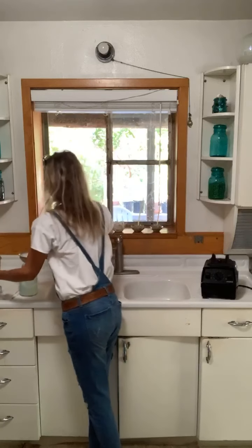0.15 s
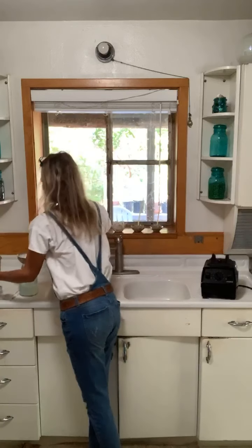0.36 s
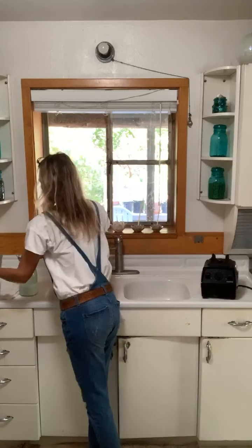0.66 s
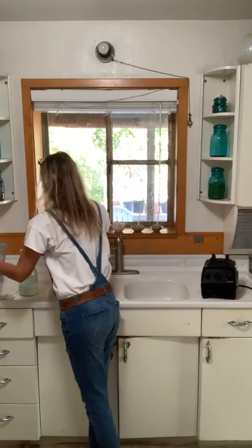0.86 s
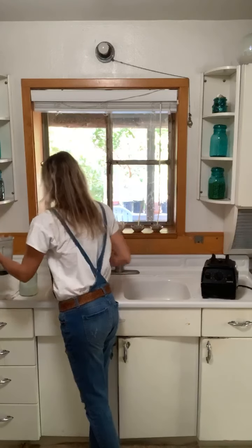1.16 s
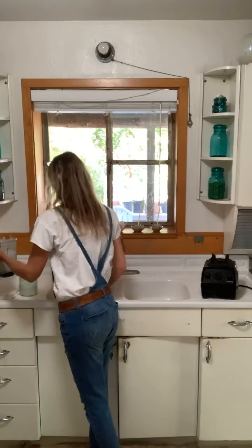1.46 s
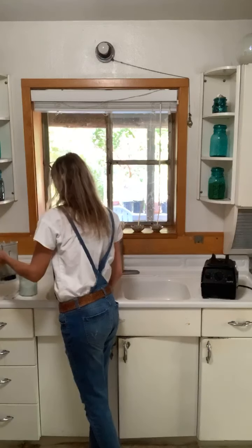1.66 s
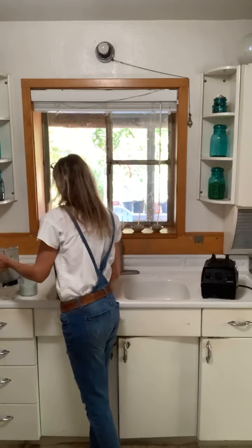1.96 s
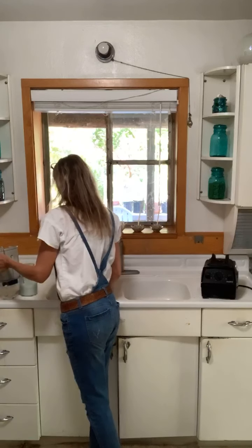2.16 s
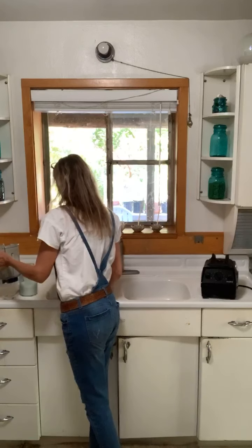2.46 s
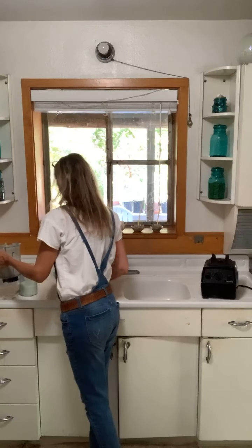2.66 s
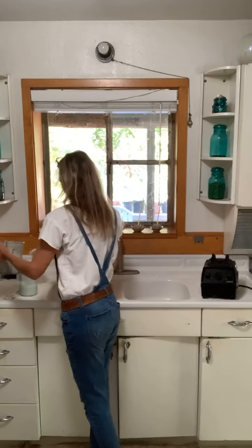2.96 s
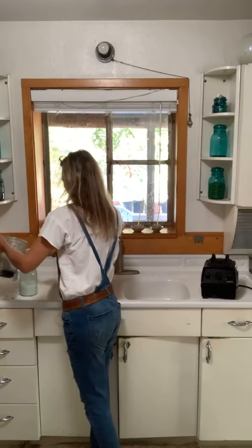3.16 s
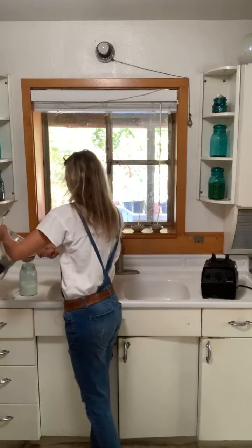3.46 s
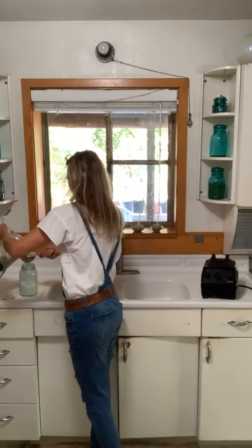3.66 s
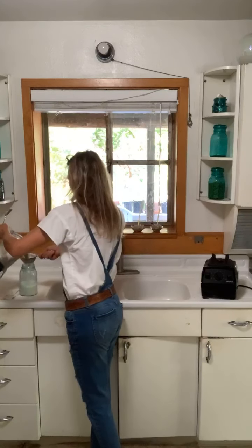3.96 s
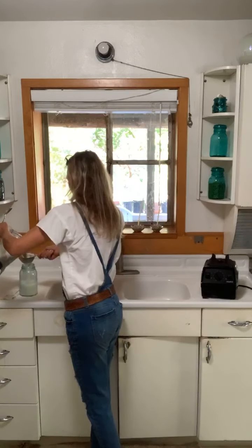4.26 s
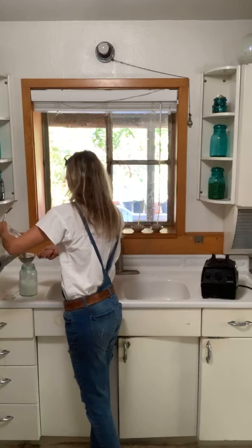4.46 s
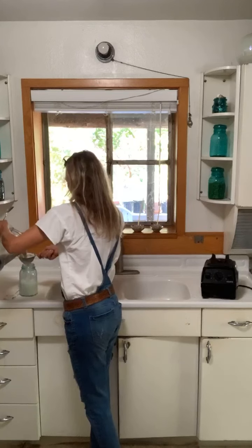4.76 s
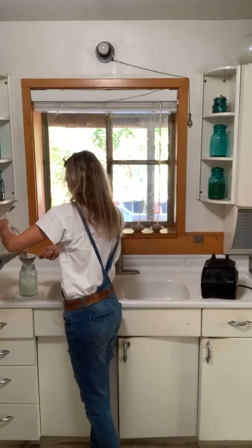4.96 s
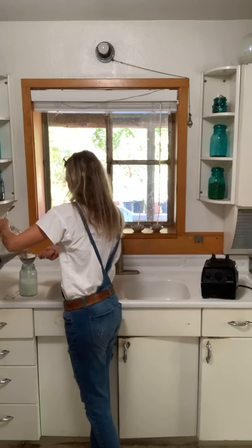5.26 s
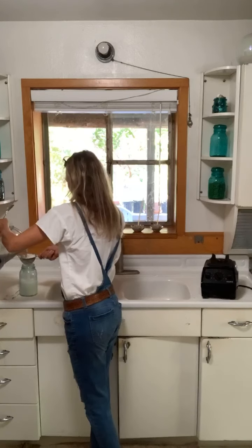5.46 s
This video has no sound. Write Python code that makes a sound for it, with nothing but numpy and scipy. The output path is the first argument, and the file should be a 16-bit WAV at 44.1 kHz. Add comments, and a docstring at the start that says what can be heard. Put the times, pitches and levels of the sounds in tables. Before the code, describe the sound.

A small hard-walled kitchen is heard from across the room, with a short echo, a low wavering motor hum and soft room air throughout. At the start something scuffs the counter; at about 0.1 s a utensil clunks down, metal and counter ringing briefly. Soft settling bumps, a scuff and a light tick follow at 0.35-0.45 s, then faint deep floor booms near 0.5-0.6 s. A faint scuff at 1.0 s and a spoon tick at 1.3 s break the lull. A metal strainer knocks a glass jar at 1.8, 2.05 and 2.27 s: sharp cracks, short metallic and glassy ringing, counter thuds. Two close ticks come at 2.7 s, a faint slide at 3.05 s. From about 3.65 s a spoon rubs softly through wet material, with irregular short scrapes and small hollow plops, clustered near 3.8-3.9, 4.3-4.6 and 4.7-5.2 s, sparse ticks, and a last faint scrape and plop around 5.5 s.

```python
"""In a small hard-walled kitchen, over a motor hum and the soft noise of room air, a utensil is put down.
It rings and settles, and the floor booms faintly under shifting feet; light spoon ticks come throughout.
Then a metal strainer is knocked three times on a glass jar: fading tones ring, and the counter thuds.
Last a spoon scrapes softly (shaped noise) and wet lumps plop into a hollow vessel (short swelling tones).
All is heard from across the room, with an echo made of fading noise."""
import sys
import numpy as np
from scipy import signal
from scipy.fft import rfft, irfft
from scipy.io import wavfile

SR = 44100
rng = np.random.default_rng(int(sys.argv[2]) if len(sys.argv) > 2 else 0)


def dump_mix(stems):
    """Bounce the given channels to the path in sys.argv[1] as a 16-bit WAV at rate SR."""
    frames = np.atleast_2d(stems).T  # one column per channel
    limited = np.clip(frames, -1, 1)  # hard clip at full scale
    pcm = np.round(limited * 32767).astype(np.int16)
    wavfile.write(sys.argv[1], SR, pcm)


N = 247783
TIME = np.arange(N) / SR  # seconds

# Tones of the counter. Each row: frequency in Hz, relative level in dB, time to fade by 60 dB in seconds.
COUNTER_TONES = [(69, -48.5, 0.92), (90, -55.5, 0.4), (109.23, -45.5, 0.21), (185.6, -42.5, 0.44),
                 (210, -38, .35), (275.4, -44.5, 0.65), (407.5, -33.5, 0.2), (480, -34.5, 0.32),
                 (529.7, -44, 0.49), (626, -49, 0.17)]
# Strokes of the spoon along the vessel wall. Each row: start in seconds, length before the release in seconds,
# rubbing level in dB, wall ring level in dB (both before the mix), wall resonance in Hz.
SPOON_STROKES = [(3.825, 0.17, -58.5, -77.5, 2156), (3.862, 0.092, -52, -80, 2240),
                 (4.034, 0.051, -53.5, -73.5, 2200), (4.123, 0.042, -53.5, -77.5, 2200),
                 (4.237, 0.019, -65.5, -75, 2340), (4.349, 0.032, -61, -100, 2330),
                 (4.503, .045, -61, -79, 2350), (4.773, 0.038, -62, -96, 2330),
                 (5.068, 0.033, -58, -92, 2330), (5.501, 0.098, -63.5, -101, 2320)]


def from_db(db):
    """Turn decibels into a gain."""
    return 10 ** (np.asarray(db) / 20)


def at_hz(points, hz):
    """Read a table between its points, along a logarithmic frequency axis."""
    f, value = np.transpose(points)
    return np.interp(np.log(np.maximum(hz, 1)), np.log(f), value)


def convolve(x, response):
    """Play x through an impulse response."""
    return signal.fftconvolve(x, response)[:N]


def clicks(times, levels_db):
    """Place one single-sample impulse for each time."""
    out = np.zeros(N)
    samples = np.round(np.asarray(times) * SR).astype(int)
    np.add.at(out, np.clip(samples, 0, N - 1), from_db(levels_db))
    return out


def colour(x, spectrum, size=4096):
    """Filter x to the given spectrum with no sound ahead of its cause (minimum phase)."""
    gain = from_db(at_hz(spectrum, np.fft.rfftfreq(size, 1 / SR)))
    cepstrum = irfft(np.log(gain))
    # Folding the cepstrum onto its first half gives minimum phase.
    cepstrum[1:size // 2] *= 2
    cepstrum[size // 2 + 1:] = 0
    return convolve(x, irfft(np.exp(rfft(cepstrum))))


def rms_one(x):
    """Scale to an rms level of 1."""
    return x / np.sqrt(np.mean(x ** 2) + 1e-20)


def ring(x, modes, rise_s):
    """Each impulse sets off a body's fading tones, which take a moment to build up."""
    t = TIME[:SR]
    tones = sum(from_db(db - 60 * t / t60) * np.sin(2 * np.pi * hz * t) for hz, db, t60 in modes)
    return convolve(x, tones * (1 - np.exp(-t / rise_s)))


def tilted(modes, db_per_octave):
    """Where a body is struck decides whether its low or its high tones ring more."""
    hz, db, t60 = np.transpose(modes)
    return np.c_[hz, db + db_per_octave * np.log2(hz / hz[0]), t60]


def blip(at, level_db, hz, rise_s):
    """A heavily damped tone that swells for rise_s and then dies away quickly."""
    t = TIME[:SR // 8]
    swell = t / rise_s * np.exp(1 - t / rise_s)
    tone = from_db(level_db) * swell * np.sin(2 * np.pi * hz * t)
    return np.pad(tone, (int(at * SR), N))[:N]


def stroke(start, length, level_db, attack_s=0.013, release_s=0.022):
    """Loudness of one sliding movement: the grip builds, holds, then dies away."""
    attack = np.clip((TIME - start) / attack_s, 0, 1)
    release = np.exp(-np.clip((TIME - start - length) / release_s, 0, 20))
    return from_db(level_db) * attack * release


def friction(spectrum, slips_per_s=1400, spread_db=3.5):
    """Dense tiny slips of uneven size, coloured by the thing that is rubbed; rms 1."""
    happens = rng.random(N) < slips_per_s / SR
    direction = rng.choice([-1, 1], N)
    size = from_db(spread_db * rng.standard_normal(N))
    return rms_one(colour(happens * direction * size, spectrum))


def background(waver=0.86, air_db=-64):
    """A motor's steady tones, each wavering in loudness by itself, over the room air's filtered noise."""
    # Hum of an appliance motor. Each row: frequency in Hz, rms level in dB before the wavering.
    hum_tones = [(59.2, -75), (118.4, -83), (177.6, -69), (236.9, -67), (759.0, -78.5), (877.5, -88.5)]
    # Colour of the air noise. Each row: frequency in Hz, relative level in dB.
    air_colour = [(22, -22), (45, -13.5), (62, -1.5), (90, -7.5), (140, -5.5), (220, 2), (280, -8.5),
                  (500, -9), (680, -20.5), (850, -19.5), (1100, -27.5), (2000, -36.5), (12500, -46),
                  (15000, -58.5)]
    hum = 0
    for hz, db in hum_tones:
        sway = signal.resample(rng.standard_normal(size=60), N)  # slow and smooth
        tone = np.sin(2 * np.pi * (hz * TIME + rng.random()))
        hum = hum + np.sqrt(2) * from_db(db) * (1 + waver * sway) * tone
    air = rms_one(colour(rng.standard_normal(N), air_colour))
    return hum + from_db(air_db) * air


def floor_boom():
    """The floor's low tones boom faintly under shifting feet."""
    # Weight shifting on the floor. Each row: time in seconds, level in dB before the floor's response.
    steps = [(0.47, -46.5), (0.603, -47.5), (.66, -67)]
    # Tones of the floor. Each row: frequency in Hz, relative level in dB, time to fade by 60 dB in seconds.
    floor_tones = [(58, -25, 0.36), (69.8, -1.5, 0.32)]
    step_times, step_db = np.transpose(steps)
    return ring(clicks(step_times, step_db), floor_tones, rise_s=0.0092)


def sliding():
    """Things scuff briefly over the counter, as bursts of friction noise."""
    # Things slid and handled. Each row: start in seconds, length before the release in seconds,
    # level in dB before the mix.
    slides = [(0.0, 0.12, -62.5), (0.348, 0.094, -55), (1.044, .04, -66.5), (3.051, 0.037, -67)]
    # Colour of the scuffing. Each row: frequency in Hz, relative level in dB.
    slide_colour = [(100, -2.5), (300, -0.5), (480, 2), (620, -2.5), (850, 1.5), (1200, -13.5),
                    (1800, -15.5), (2800, -27.5), (4500, -29), (14000, -47)]
    return friction(slide_colour) * sum(stroke(*row) for row in slides)


def ticks():
    """The spoon brushes glass and wire: a bright tick on a very short tap."""
    # Light touches. Each row: time in seconds, bright tick level in dB, tap level in dB
    # (both before the mix), tap pitch in Hz.
    touches = [(.086, -37, -58, 2800), (0.4542, -32, -54, 3870), (1.31, -32, -48.5, 1160),
               (2.681, -24, -45, 1930), (2.724, -45.5, -44, 1398), (4.542, -42, -59, 2457),
               (5.064, -36.5, -53.5, 3826), (5.09, -64.5, -58.5, 1400), (5.566, -43.5, -61, 3050)]
    # Colour of the bright tick. Each row: frequency in Hz, relative level in dB.
    tick_colour = [(1200, -13), (1700, -1), (2200, -12), (2750, 2.5), (3300, -14), (4400, -11.5),
                   (5800, -0.5), (7400, -1.5), (9000, -20.5), (12500, -14.5), (15500, -20)]
    at, bright_db = np.transpose(touches)[:2]
    bright = colour(clicks(at, bright_db), tick_colour)
    taps = sum(blip(s, db, hz, rise_s=0.00011) for s, _, db, hz in touches)
    return bright + taps


def rubbing(stir_start_s=3.63, stir_length_s=1.336, stir_db=-66):
    """The spoon's strokes rub the wet mass, which also shifts softly under them, as friction noise."""
    # Colour of the rubbing, with the hollow of the vessel in it. Each row: frequency in Hz, relative level in dB.
    rub_colour = [(100, -2), (300, -4.5), (460, 13), (620, -5), (780, 2), (880, -6.5), (980, -6),
                  (1130, -13.5), (1280, -11), (1750, -26), (2600, -33), (4000, -35.5), (7000, -41),
                  (14000, -51)]
    movements = [stroke(s, length, db) for s, length, db, _, _ in SPOON_STROKES]
    movements.append(stroke(stir_start_s, stir_length_s, stir_db))
    return friction(rub_colour) * np.linalg.norm(movements, axis=0)  # their powers add up


def dragging(width_hz=110, overtone=1.42, overtone_db=-9, grain_db=4):
    """Uneven friction feeds two wall resonances, whose pitch depends on where the stroke falls."""
    smoother = signal.butter(2, width_hz, fs=SR, output="sos")
    grip = signal.sosfilt(smoother, rng.standard_normal((2, N)))
    catches = from_db(grain_db * signal.resample(rng.standard_normal(size=600), N))
    out = 0
    for s, length, _, db, hz in SPOON_STROKES:
        phase = 2 * np.pi * hz * TIME
        low = grip[0] * np.sin(phase)
        high = from_db(overtone_db) * grip[1] * np.sin(overtone * phase)
        out = out + rms_one((low + high) * catches) * stroke(s, length, db)
    return out


def plops():
    """Each wet lump briefly rings the air in the vessel."""
    # Lumps landing. Each row: time in seconds, peak level in dB before the mix, pitch of the cavity in Hz.
    lumps = [(3.749, -42.5, 437), (3.842, -43, 420), (3.904, -45, 483), (3.927, -46.5, 463),
             (4.333, -47.5, 469), (4.354, -43.5, 483), (4.52, -41.5, 474), (4.551, -40.5, 483),
             (4.743, -44.5, 477.5), (4.786, -52, 490), (4.875, -49, 460), (4.928, -47, 490),
             (5.069, -40, 478), (5.209, -52, 488), (5.567, -51.5, 482)]
    return sum(blip(s, db, hz, rise_s=0.0071) for s, db, hz in lumps)


def set_down():
    """A utensil clunks on the counter, both ring, and soft settling bumps follow."""
    # The meeting. Each row: time in seconds, click level in dB, utensil ring level in dB,
    # counter ring level in dB (all relative), delay of both rings in seconds.
    landing = [(0.122, -1.5, 0, -2, 0.0035)]
    # Colour of the click. Each row: frequency in Hz, relative level in dB.
    click_colour = [(60, 4), (125, 10), (200, 13), (400, -10), (760, 17.5), (1150, -4), (1700, 5),
                    (2800, -3), (4000, -9.5), (7000, -15), (8500, -21), (15000, -28.5)]
    # Tones of the utensil. Each row: frequency in Hz, relative level in dB, time to fade by 60 dB in seconds.
    utensil_tones = [(499, -52, 0.56), (732, -41.5, 0.73), (756, -27, 0.29), (1416, -38.5, 0.34),
                     (1540, -53, 0.27), (1860, -39, 0.12), (1870, -69, 0.28), (2320, -51.5, 0.4),
                     (2570, -43, 0.16), (2920, -52, 0.24), (3030, -44.5, 0.13), (3840, -50.5, .24),
                     (4300, -50.5, 0.17), (6520, -63, 0.14), (7100, -60, 0.26)]
    # Sliding and settling. Each row: time in seconds, peak level in dB, pitch in Hz.
    settling = [(.345, -56, 808), (.385, -49, 701), (0.413, -44.5, 449), (0.433, -40.5, 223)]
    at, click_db, ring_db, counter_db, lag = np.transpose(landing)
    click = colour(clicks(at, click_db), click_colour)
    utensil = ring(clicks(at + lag, ring_db), utensil_tones, rise_s=0.0036)
    counter = ring(clicks(at + lag, counter_db), COUNTER_TONES, rise_s=0.051)
    bumps = sum(blip(s, db, hz, rise_s=0.0086) for s, db, hz in settling)
    return click, utensil + counter + bumps


def knocks(clack_db=-18, counter_lag_s=0.00891, onset_s=0.0022, onset_db=-15, thud_cycles=0.69):
    """Each knock cracks, clacks the rim and rings metal and glass; the counter answers a moment later."""
    # Strainer on jar. Each row: time in seconds, crack level in dB, strainer ring level in dB, strainer tilt
    # in dB per octave, glass ring level in dB, rim clack level in dB, counter ring level in dB,
    # thud level in dB (all levels relative), thud delay in seconds, thud pitch in Hz.
    knock_rows = [(1.79, 3, 4.5, -1, 2, -10, 2.5, -28, 0.0063, 106),
                  (2.0445, -1, 2.5, -1.5, -13.5, -2, 3.5, -14.5, 0.033, 490),
                  (2.269, 0, 0.5, 1.5, -19.5, -2.5, 0, -19, 0.011, 238)]
    # Colour of the contact click. Each row: frequency in Hz, relative level in dB.
    crack_colour = [(60, -0.5), (110, 4), (200, 11), (450, 14), (700, 8.5), (1050, 12.5), (1500, 5.5),
                    (2200, 7), (4000, -1), (5300, -2), (7000, 5), (8300, -4), (11500, -7), (15500, -12.5)]
    # Tones of the strainer, then of the jar. Each row: frequency in Hz, relative level in dB,
    # time to fade by 60 dB in seconds.
    strainer_tones = [(861, -39.5, .68), (1919, -36, .4), (905, -43, .25), (975, -40, .3), (1040, -41, .25),
                      (1156, -44, .35), (1249, -52, .35), (1882, -38, .22), (2113, -45, .28),
                      (3101, -48, .25), (3289, -39, .27)]
    jar_tones = [(4946, -32, .13), (4972, -33, .12), (5200, -27, .02), (5520, -36, .07), (5669, -40, .1),
                 (6481, -33, .09), (6815, -30, .09), (6853, -29, .14), (7000, -22, .02), (7257, -36, .09),
                 (9050, -36, .14), (9205, -39, .09), (11490, -43, .1), (11860, -43, .1), (12450, -42, .08),
                 (13490, -41, .1)]
    at, crack_db, metal_db, tilt, glass_db, rim_db, counter_db, thud_db, lag, thud_hz = np.transpose(knock_rows)

    soft_onset = clicks(at - onset_s, crack_db + onset_db)  # makes the start less abrupt
    crack = colour(clicks(at, crack_db) + soft_onset, crack_colour)
    glass = ring(clicks(at, glass_db), jar_tones, rise_s=0.00053)
    clack = sum(blip(s, clack_db + db, hz=1045, rise_s=0.0016) for s, db in zip(at, rim_db))
    thud = sum(blip(s, db, hz, thud_cycles / hz) for s, db, hz in zip(at + lag, thud_db, thud_hz))
    metal = 0
    for s, db, slope in zip(at, metal_db, tilt):
        metal = metal + ring(clicks([s], [db]), tilted(strainer_tones, slope), rise_s=0.0061)
    counter = ring(clicks(at + counter_lag_s, counter_db), COUNTER_TONES, rise_s=0.0056)
    return crack + glass, clack + thud, metal + counter


def reflections(build_s=0.0063, early_db=3, early_s=0.0083):
    """The kitchen's echo as fading noise: a strong burst off the near walls, then a tail whose bass lasts longest."""
    # How long the echo lasts. Each row: frequency in Hz, time to fade by 60 dB in seconds.
    echo_times = [(80, 0.91), (300, 0.34), (1000, 0.39), (2500, 0.38), (5000, 0.26), (8000, 0.23),
                  (14000, 0.18)]
    t, hz = TIME[:SR], np.fft.rfftfreq(SR, 1 / SR)
    white = rfft(rng.standard_normal(SR))
    centres = np.array(echo_times)[:, 0]
    arrival = (1 - np.exp(-t / build_s)) * (1 + from_db(early_db) * np.exp(-t / early_s))
    out = 0
    # Each share is 1 at its own centre and 0 at the others, so the bands overlap smoothly.
    for share, (_, t60) in zip(np.eye(len(centres)), echo_times):
        fade = arrival * np.exp(-np.log(1000) * t / t60)
        band = irfft(white * at_hz(np.c_[centres, share], hz), SR)
        out = out + band * fade / np.linalg.norm(fade)
    return out


def scene():
    """Sharp contacts arrive mostly by way of the walls; duller sounds stand clearer of their echo."""
    clink, body, knock_ring = knocks()
    clunk, clunk_ring = set_down()
    sharp, light = clink + clunk, ticks()
    ringing = knock_ring + clunk_ring + floor_boom()
    soft = from_db(2.5) * plops() + sliding() + rubbing() + dragging()
    # Each row: sound, direct level in dB, level sent to the walls in dB.
    mix = [(sharp, -20.5, 2.0),
           (light, -5.5, -0.5),
           (body, -4.0, -5.0),
           (soft, -2.5, -6.0),
           (ringing, 0.0, -15.0)]
    direct = sum(from_db(db) * sound for sound, db, _ in mix)
    to_walls = sum(from_db(db) * sound for sound, _, db in mix)
    return (direct + convolve(to_walls, reflections()) + background())[None]


def record(dry, low_cut_hz=48, high_cut_hz=16000):
    """The microphone drops the deep bass; the top is cut steeply."""
    bass_cut = signal.butter(3, low_cut_hz, "high", fs=SR, output="sos")
    treble_cut = signal.ellip(10, .2, 70, high_cut_hz, fs=SR, output="sos")  # 0.2 dB ripple, 70 dB down
    return signal.sosfilt(treble_cut, signal.sosfilt(bass_cut, dry))


dry = scene()
out = record(dry)
dump_mix(out)
```